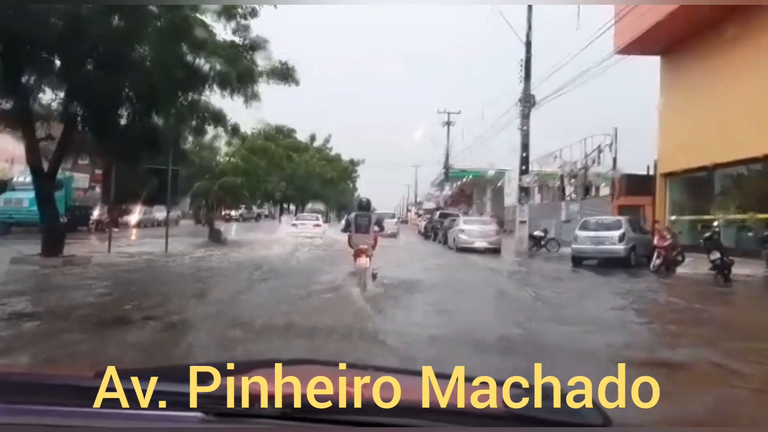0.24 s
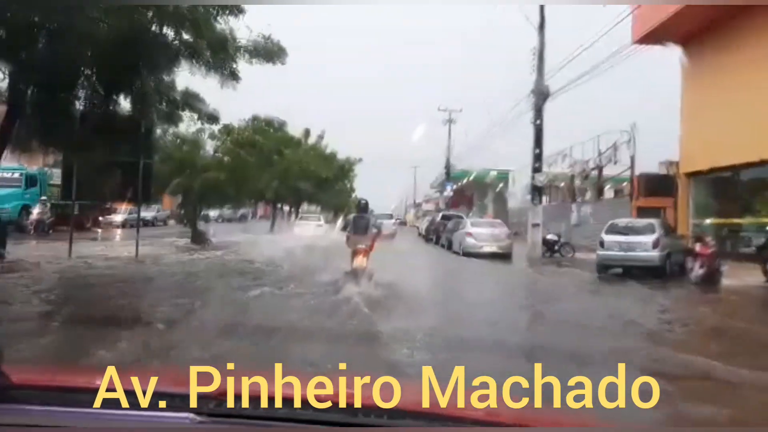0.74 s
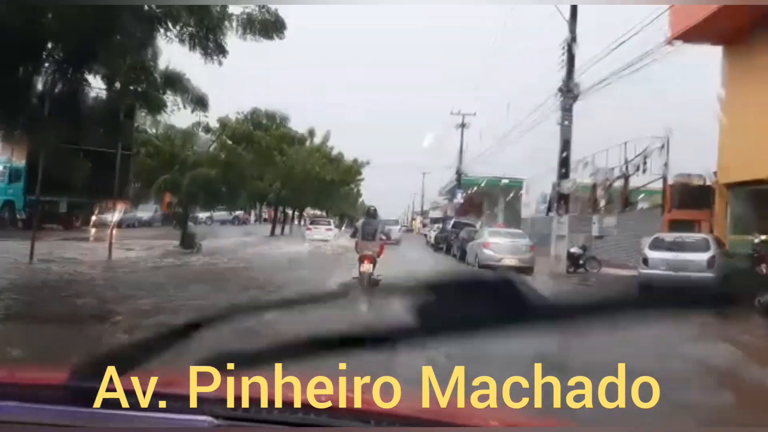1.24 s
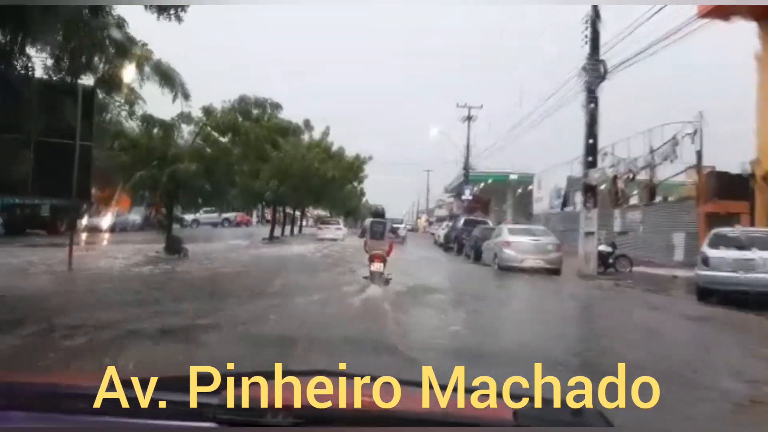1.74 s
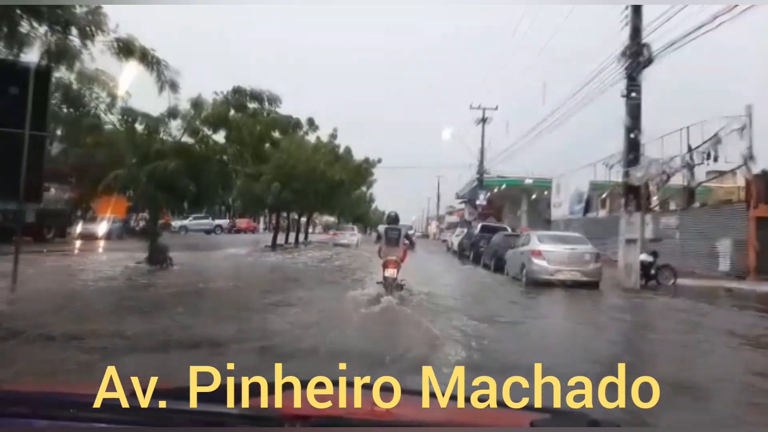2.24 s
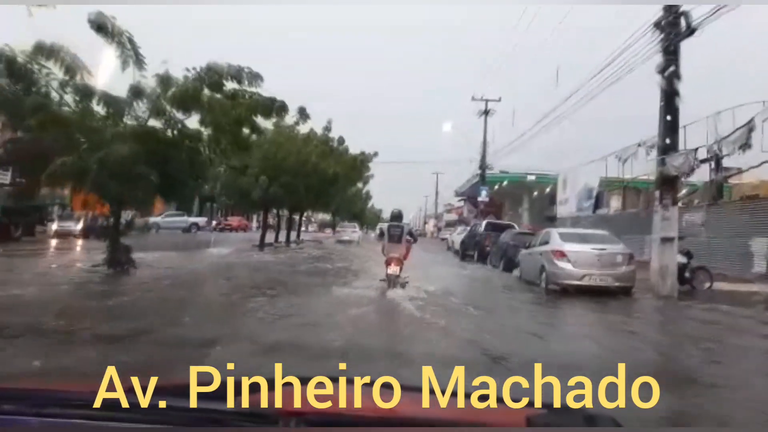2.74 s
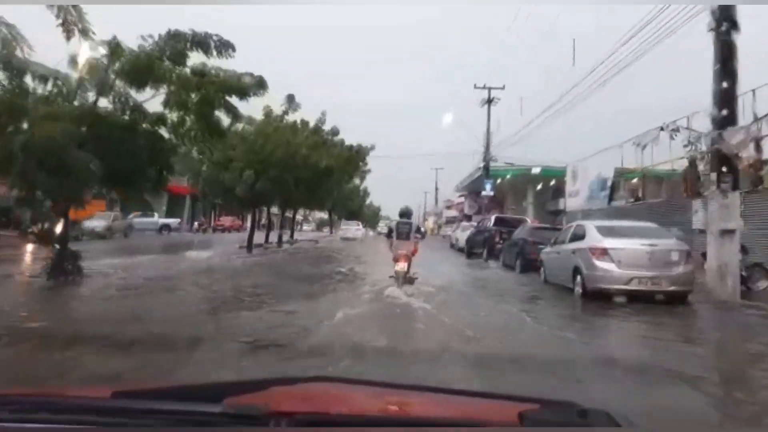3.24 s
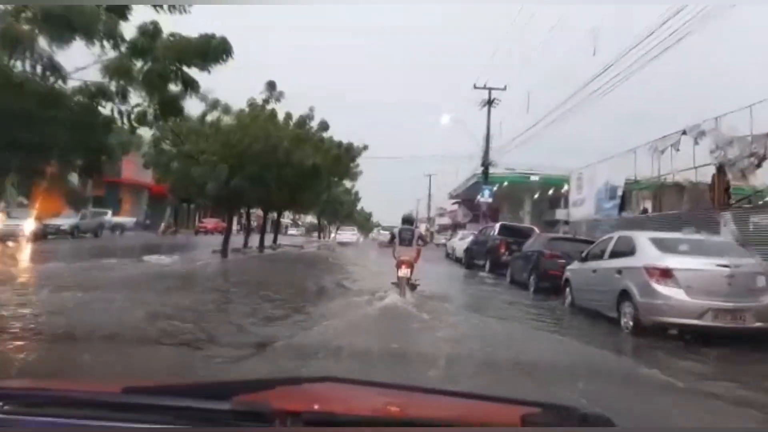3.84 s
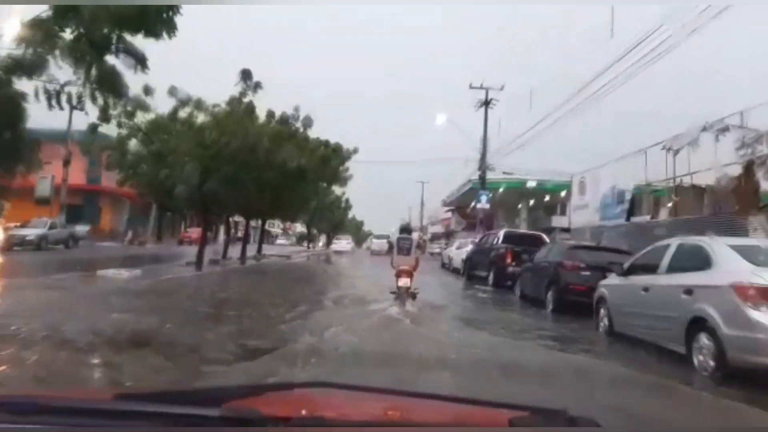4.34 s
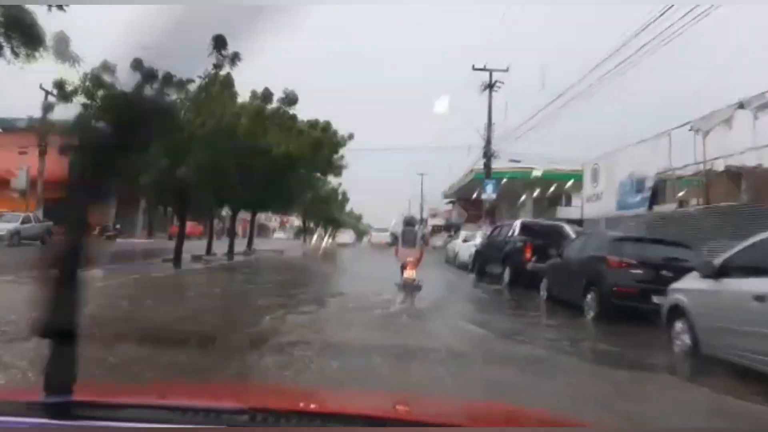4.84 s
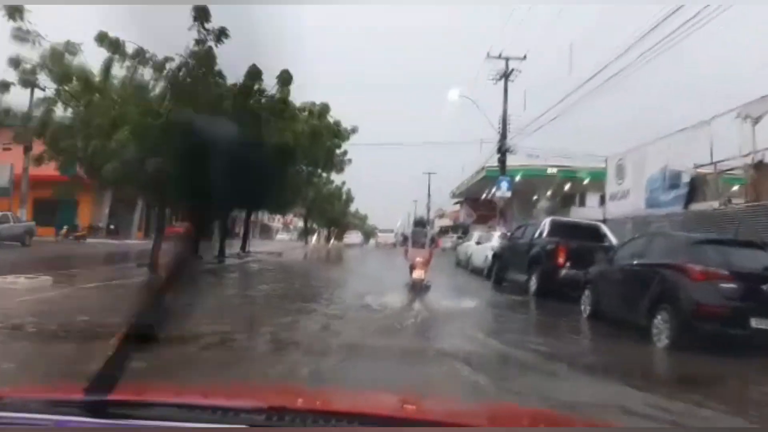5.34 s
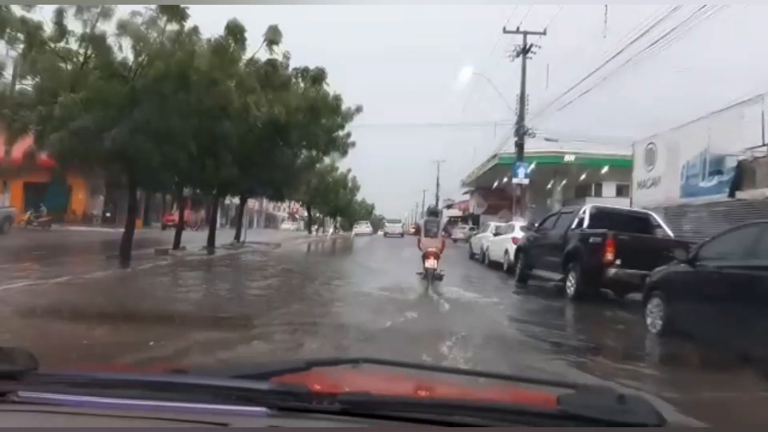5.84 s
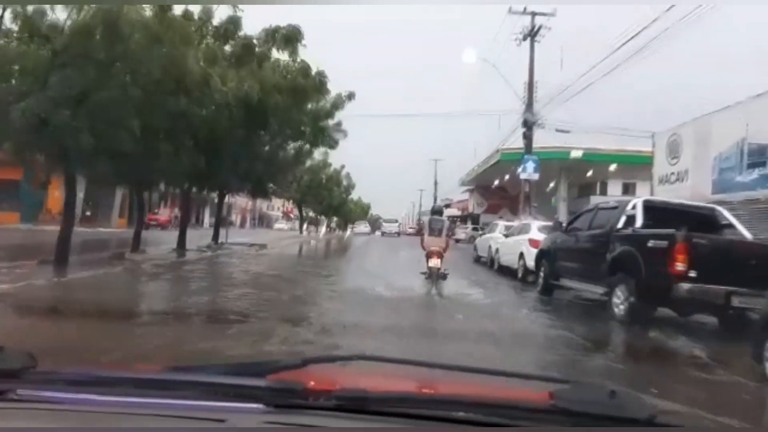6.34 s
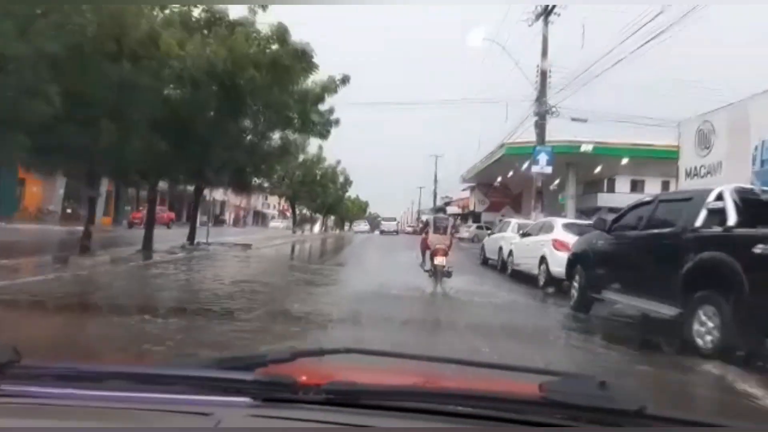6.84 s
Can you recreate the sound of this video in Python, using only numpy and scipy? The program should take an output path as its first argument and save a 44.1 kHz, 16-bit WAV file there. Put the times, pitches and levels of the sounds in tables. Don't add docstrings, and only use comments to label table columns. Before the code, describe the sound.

Inside a slow car on a flooded street, a bassy engine boom swells in irregular surges over dense tyre rumble and muffled displaced water. Wipers sweep soon after the start and again past the middle, each with a tiny relay tick, groaning linkage, wet rubber scrape and low shuddering judder. A quiet rain hiss and a few drop cracks sit on top. Close stereo cabin microphone, bass-heavy.

```python
import sys
import numpy as np
from scipy import signal
from scipy.fft import rfft, irfft, next_fast_len
from scipy.io import wavfile
from scipy.ndimage import uniform_filter1d

SR = 44100
rng = np.random.default_rng(int(sys.argv[2]) if len(sys.argv) > 2 else 0)


def linear_from_db(decibels):
    return 10 ** (np.asarray(decibels, float) / 20)


def store_pcm(level_fs):
    pcm = np.round(np.clip(level_fs, -1, 1) * 32767).astype(np.int16)
    wavfile.write(sys.argv[1], SR, np.atleast_2d(pcm).T)


N = 312228
LEAD = 4096
M = next_fast_len(N + 2 * LEAD, real=True)
HZ = np.fft.rfftfreq(M, 1 / SR)
T = (np.arange(M) - LEAD) / SR
SLOW = T[::64]


# peak t/s, level/dB, length/s, firing f/Hz
BOOM_SURGES = [(.13, -25.5, 0.033, 52.25), (.25, -23.5, 0.044, 52.2), (.35, -20.5, 0.046, 55.64),
               (.76, -19.5, 0.083, 55.9), (.98, -25.5, .05, 59.95), (1.28, -26.5, 0.1, 54.6),
               (1.49, -22, .06, 54.4), (1.72, -25, .1, 54.2), (2.04, -24, 0.058, 56.85),
               (2.18, -22.5, 0.025, 57.7), (2.3, -19, 0.046, 55.5), (2.48, -21.5, 0.046, 55.2),
               (2.77, -24.5, 0.019, 55.8), (2.96, -17.5, 0.031, 56), (3.08, -17.5, 0.067, 56),
               (3.45, -23, 0.073, 57.3), (3.72, -25, 0.074, 57), (3.9, -20, 0.048, 55.9),
               (4.1, -21.5, 0.048, 54.6), (4.24, -16.5, 0.026, 55.7), (4.55, -16.5, 0.081, 57.04),
               (4.91, -24, 0.04, 53.2), (5.05, -21, .05, 57.4), (5.22, -19, 0.046, 57.4),
               (5.61, -20, .08, 57.6), (6.03, -21.5, 0.053, 55.2), (6.33, -27, .09, 60.45),
               (6.62, -26.5, .05, 58.6), (6.81, -24, 0.056, 60.1), (7.03, -18, 0.091, 53)]


def engine():
    idle_db, limit_db, trim_db = -32.5, -13, -1.2
    cycles = np.cumsum(curve(BOOM_SURGES, axis=3)) / SR
    level = linear_from_db(idle_db)
    for peak_s, db, length_s, _ in BOOM_SURGES:
        level = level + linear_from_db(db) * swell(peak_s, length_s, length_s)
    level = np.interp(T, SLOW, np.minimum(level, linear_from_db(limit_db)))
    return level * linear_from_db(trim_db) * np.sqrt(2) * np.sin(2 * np.pi * cycles)


# t/s, wading effort/dB, rain strength/dB
STREET_COURSE = [(0, 0.5, -0.5), (.35, 1.5, 0), (.98, 0.5, -2.5), (1.23, -3, -2), (1.65, -1, -1),
                 (1.92, -2.5, -1), (2.39, 2, .5), (2.72, 1.5, 1), (3.28, 0, 0), (3.82, 0, -.5),
                 (4.2, -1.5, 1.5), (4.5, 2.5, 1), (5.18, 0.5, -0.5), (5.4, -1, 0), (5.9, -1, 0),
                 (6.15, -0.5, -.5), (6.4, -1.5, 0), (6.85, 1, 1)]
# f/Hz, density/dB per Hz
RUMBLE_SPECTRUM = [(13, -50), (22, -27), (29, -7.5), (36, -14.5), (43, -5), (58, -2.5), (81, -2.5),
                   (134, -4), (184, -11.5), (205, -19), (262, -18), (333, -30), (400, -31), (520, -41.5),
                   (880, -120)]
# f/Hz, density/dB per Hz
ROAR_SPECTRUM = [(120, -37), (200, -3.5), (264, -0.5), (337, -8.5), (568, -13.5), (620, -13.5),
                 (725, -18.5), (893, -21.5), (992, -21), (1210, -26.5), (1600, -29), (2080, -42),
                 (3520, -120)]


def tyres():
    rumble_db, roar_db, roar_share = -21.5, -32, 0.37
    wading_db = curve(STREET_COURSE, axis=1)
    rumble = coloured(patchy(patch_db=-0.66, flicker_db=0.8), RUMBLE_SPECTRUM)
    roar = coloured(patchy(patch_db=1.0, flicker_db=-0.1), ROAR_SPECTRUM)
    return linear_from_db(rumble_db + wading_db) * rumble + linear_from_db(roar_db + roar_share * wading_db) * roar


# start t/s, scrape/dB, groan/dB, parked-blade groan/dB, grip change/dB per s
WIPER_SWEEPS = [
    (.3514, -2.5, -1.5, -0.3, 5.5),
    (4.538, 3, 2.5, 1, -7.5),
]
# delay/s, hold/s, blade scrape/dB, linkage groan/dB
BREAKAWAY_PUSHES = [(.06, .03, -65, -29.5), (.16, .04, -63, -31), (.23, .03, -59, -31.5)]
# delay/s, hold/s, blade scrape/dB, linkage groan/dB
STROKE_PUSHES = [(.285, .05, -49, -29.5), (.35, .05, -55, -36), (.43, .065, -46.5, -26),
                 (.515, .05, -51, -25.5)]
# f/Hz, density/dB per Hz
SCRAPE_SPECTRUM = [(800, -21.5), (1250, -8), (2000, -9), (3000, -12), (4000, -17), (5800, -18),
                   (7000, -21.5), (8500, -26.5), (10000, -35), (12000, -33.5), (15000, -45)]
# f/Hz, width/Hz, level/dB
LINKAGE_MODES = [(256.3, 27, 4.5), (340.5, 77, -3), (480.4, 68, -7.5), (610, 104, -14), (790, 230, -20),
                 (994, 140, -23)]
# f/Hz, density/dB per Hz
DRAG_SPECTRUM = [(400, -12.5), (700, 13), (1200, 2), (1600, -0.5), (2200, -5.5), (3000, -13), (3600, -21),
                 (6000, -40.5)]


def wiper_sweeps():
    slips = patchy(patch_db=0.5, flicker_db=-0.75)
    slips = slips + linear_from_db(-2.0) * grains(per_s=160, spread_db=0.5, t60_s=0.014)
    scrape = coloured(slips, SCRAPE_SPECTRUM)
    modes = sum(linear_from_db(db) / (1 + 2j * (HZ - hz) / width_hz) ** 2 for hz, width_hz, db in LINKAGE_MODES)
    groan = evened(irfft(rfft(slips) * modes, M)) + linear_from_db(-9.5) * coloured(slips, DRAG_SPECTRUM)
    power = np.zeros((2, len(SLOW)))
    for start_s, scrape_db, groan_db, parked_db, grip_db_per_s in WIPER_SWEEPS:
        for pushes, strain_db in ((BREAKAWAY_PUSHES, parked_db), (STROKE_PUSHES, groan_db)):
            for delay_s, hold_s, blade_db, link_db in pushes:
                level = linear_from_db([[blade_db + scrape_db], [link_db + strain_db]])
                level = level * linear_from_db(grip_db_per_s * delay_s)
                power += (level * push_envelope(start_s + delay_s, hold_s)) ** 2
    blade, link = (np.interp(T, SLOW, np.sqrt(p)) for p in power)
    return blade * scrape + link * groan


def push_envelope(start_s, hold_s):
    attack_s, release_s, flat_s = 0.02, 0.016, 1e3
    return swell(start_s, attack_s, flat_s) * swell(start_s + hold_s, flat_s, release_s)


# peak t/s, level/dB, slip rate f/Hz, build-up/s, dying/s
BLADE_SHUDDERS = [
    (.405, -17, 108.3, 0.012, 0.039),
    (0.483, -16.5, 98, .02, 0.042),
    (.81, -16.5, 116, .015, 0.026),
    (.912, -11, 102.3, 0.043, 0.047),
    (4.6, -18, 103.8, 0.022, .04),
    (4.99, -17, 109.7, 0.031, .035),
    (5.095, -11.5, 102.5, 0.021, 0.064),
    (7.062, -13, 91.7, 0.0074, 0.012),
]
# multiple, level/dB
SLIP_HARMONICS = [(1, -1.5), (2, -12), (3, -19), (4, -35)]


def wiper_shudders():
    sag_hz_per_s = 99
    out = np.zeros((1, M + SR))
    t = np.arange(-LEAD * 2, LEAD * 2) / SR
    for peak_s, peak_db, hz, rise_s, fall_s in BLADE_SHUDDERS:
        cycles = hz * t - sag_hz_per_s * t ** 2 / 2
        stack = sum(linear_from_db(db) * np.cos(2 * np.pi * k * cycles) for k, db in SLIP_HARMONICS)
        add(out, peak_s, np.sqrt(2) * linear_from_db(peak_db) * swell(0, rise_s, fall_s, t) * stack[None])
    return out[0, :M]


# t/s, peak/dB, t60/s
RELAY_TICKS = [
    (0.3514, -47.5, 0.063),
    (1.5469, -48.5, 0.052),
    (4.538, -47.5, 0.059),
    (5.7428, -47, 0.05),
]
# f/Hz, gain/dB
RELAY_GAIN = [(3000, -22), (6000, -2), (8500, -6.5), (10000, -6), (11800, 2.5), (13200, -6), (14500, -18),
              (16000, -22)]


def relay():
    ticks = np.zeros((2, M))
    for s, db, t60_s in RELAY_TICKS:
        add(ticks, s, linear_from_db(db) * burst(t60_s, rise_s=0.0016, halo_db=-8, halo_s=0.0212))
    return irfft(rfft(ticks) * linear_from_db(read(RELAY_GAIN, HZ) + 2.0), M)


# t/s, peak/dB, ring f/Hz, width/Hz, t60/s
DROPS_AND_KNOCKS = [(.619, -50, 5700, 1400, .04), (2.369, -55, 5100, 3700, .03),
                    (3.583, -48, 5200, 2800, .04), (3.772, -52, 7700, 2500, 0.025),
                    (3.812, -46, 6000, 900, .06), (3.985, -59, 11500, 2000, .06),
                    (4.212, -51, 9500, 1500, 0.021), (4.413, -38, 6400, 3300, 0.025),
                    (4.26, -61, 10300, 4000, 0.02), (4.6, -50, 2400, 2500, 0.022),
                    (3.805, -42.5, 5800, 3000, .018), (4.985, -25, 628, 300, 0.091),
                    (5.012, -9.5, 255, 49, 0.14), (0.48, -34, 400, 120, 0.14), (0.38, -26, 410, 33, .1),
                    (4.414, -39, 2200, 1800, .025), (4.415, -50, 5800, 700, .06), (.925, -20, 255, 70, .12),
                    (4.4, -22, 270, 70, .1), (4.815, -49, 5900, 2000, .09), (.815, -52, 6000, 2500, .05)]


def drops_and_knocks():
    out = np.zeros((2, M))
    for s, db, hz, width_hz, t60_s in DROPS_AND_KNOCKS:
        crack = burst(t60_s, rise_s=0.00071, halo_db=-21, halo_s=0.015)
        ring = resonate(resonate(crack, hz, width_hz), hz, width_hz)
        add(out, s, linear_from_db(db) * np.sqrt(SR / width_hz / 4) * ring)
    return out


# f/Hz, density/dB per Hz
HISS_SPECTRUM = [(590, -24), (1000, -4.5), (1200, -12), (1500, -6), (1900, -7.5), (2250, -9), (2700, -10.5),
                 (3300, -15.5), (4070, -14.5), (5200, -20), (7000, -27), (9500, -42.5), (15000, -65.5)]
# f/Hz, density/dB per Hz
SPRAY_SPECTRUM = [(4000, -24.5), (7000, -6), (9000, 3), (11500, 0), (12900, -1.5), (13300, -4.5),
                  (14500, -3.5), (16000, -6)]


def rain():
    hiss_db, spray_db, spray_share, spray_db_per_s = -47, -68, 1.1, 0.45
    near = grains(per_s=500, spread_db=3.0, t60_s=0.03)
    water = patchy(patch_db=1.18, flicker_db=0.5) + linear_from_db(-14.0) * near
    rain_db = curve(STREET_COURSE, axis=2)
    hiss = linear_from_db(hiss_db + rain_db) * coloured(water, HISS_SPECTRUM)
    spray_level = linear_from_db(spray_db + spray_share * rain_db + spray_db_per_s * T)
    return hiss + spray_level * coloured(water[::-1], SPRAY_SPECTRUM)


def patchy(patch_db, flicker_db):
    frames = M // 64 + 5
    a, b, c, d, patches = rng.standard_normal((frames, 129, 5)).T
    patches = uniform_filter1d(patches, size=4, axis=0)
    patches = evened(uniform_filter1d(patches, size=40, axis=1))
    flicker = evened(uniform_filter1d(rng.standard_normal(frames), size=12))
    z = np.array([a + 1j * b, c + 1j * d]) * linear_from_db(patch_db * patches + flicker_db * flicker)
    return evened(signal.istft(z, nperseg=256, noverlap=192)[1][:, :M])


def grains(per_s, spread_db, t60_s):
    sizes = linear_from_db(spread_db * np.minimum(rng.exponential(1, M), 5)) * (rng.random(M) < per_s / SR)
    signs = rng.choice([-1., 1.], M)
    tails = rng.standard_normal((2, 900)) * linear_from_db(-60 * np.arange(900) / SR / t60_s)
    return evened(signal.oaconvolve(sizes[None] * signs, tails, axes=1)[:, :M])


def burst(t60_s, rise_s, halo_db, halo_s):
    t = np.arange(-3000, 3000) / SR
    shape = np.clip(1 + t / rise_s, 0, 1) * linear_from_db(-60 * np.maximum(t, 0) / t60_s)
    halo = linear_from_db(halo_db) * np.exp(-(t / halo_s) ** 2)
    return (shape + halo) * rng.standard_normal((2, len(t)))


def resonate(x, hz, width_hz):
    turn = np.exp(2j * np.pi * hz * np.arange(x.shape[-1]) / SR)
    r = np.exp(-np.pi * width_hz / SR)
    return 2 * (turn * signal.lfilter([1 - r], [1, -r], x / turn)).real


def swell(peak_s, rise_s, fall_s, t=SLOW):
    return np.exp(-((t - peak_s) / np.where(t < peak_s, rise_s, fall_s)) ** 2)


def evened(x):
    return x / np.sqrt(np.mean(x ** 2) + 1e-20)


def read(points, hz, axis=1):
    table = np.transpose(points)
    return np.interp(np.log(hz + 1), np.log(table[0] + 1), table[axis])


def curve(rows, axis):
    table = np.transpose(rows)
    return np.interp(T, table[0], table[axis])


def coloured(x, points):
    return evened(irfft(rfft(x) * linear_from_db(read(points, HZ)), M))


def add(mix, s, sound):
    start = round(s * SR) + LEAD - sound.shape[1] // 2
    mix[:, start:start + sound.shape[1]] += sound


# f/Hz, likeness/0-1, right lead/rad, left-right/dB
PORT_PAIR = [(29.7, 0.85, -0.5, 5), (60, 0.88, 1.0, 2), (89, 0.85, 0.5, 4.5), (144.4, 0.98, -0.5, 2.5),
             (257, 0.93, 1.16, 0), (316, 0.82, -1.1, 1), (533, 0.7, -0.5, 1), (714, 0.12, 1, 0.4),
             (1230, 0.25, 2.5, 1.2), (2000, 0.01, 4, -2.5), (3500, 0.05, 1.5, 0), (15000, 0.41, 2, -0.5)]
# f/Hz, gain/dB
PASSBAND_GAIN = [(15, -30), (30, -6), (45, 0), (15760, 0), (15800, -70)]


def ports(paths):
    first, second = rfft(paths) * linear_from_db(read(PASSBAND_GAIN, HZ))
    same = np.clip(read(PORT_PAIR, HZ), 0, 1)
    lead = np.exp(1j * read(PORT_PAIR, HZ, axis=2))
    right = same * first * lead + np.sqrt(1 - same ** 2) * second
    tilt = linear_from_db(read(PORT_PAIR, HZ, axis=3) / 2)
    return irfft(np.array([first * tilt, right / tilt]), M)


def deepened(x):
    z = signal.stft(x, nperseg=2048, noverlap=1536)[2]
    power = abs(z) ** 2 + 1e-20
    around = uniform_filter1d(uniform_filter1d(power, size=15, axis=1), size=3, axis=2)
    gain = np.minimum(power / (abs(around) + 1e-20), 2.5) ** 0.11
    return signal.istft(z * gain, nperseg=2048, noverlap=1536)[1]


def scene():
    tones = (engine() + wiper_shudders()) * [[1], [0]]
    paths = tones + tyres() + wiper_sweeps() + relay() + drops_and_knocks() + rain()
    return deepened(ports(paths))[:, LEAD:LEAD + N]


def low_pass(x):
    return signal.sosfilt(signal.butter(12, 16870, fs=SR, output="sos"), x)


def record(dry):
    mix = linear_from_db(-0.3) * dry
    return low_pass(mix)


dry = scene()
out = record(dry)
store_pcm(out)
```